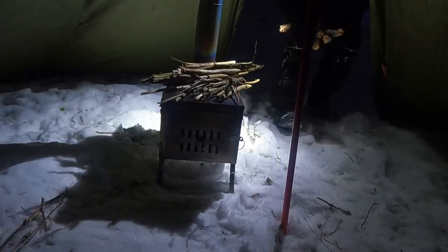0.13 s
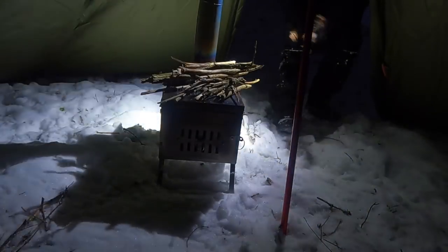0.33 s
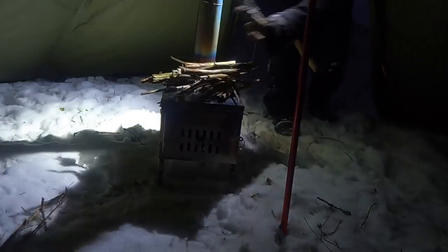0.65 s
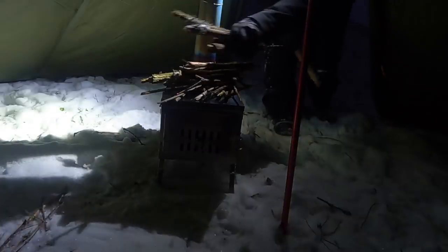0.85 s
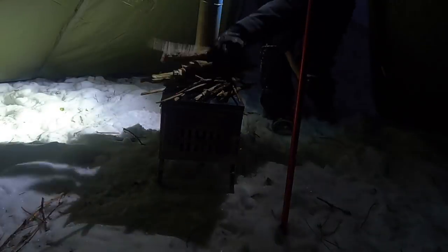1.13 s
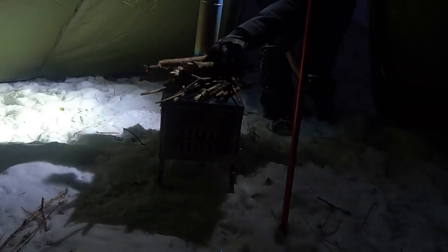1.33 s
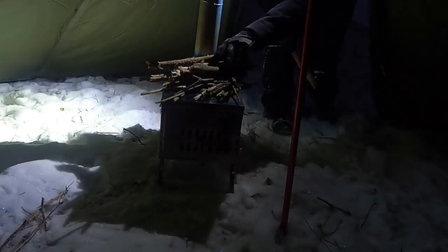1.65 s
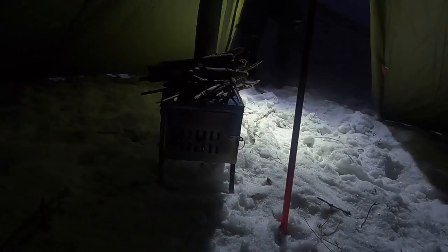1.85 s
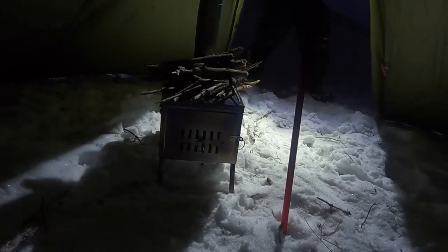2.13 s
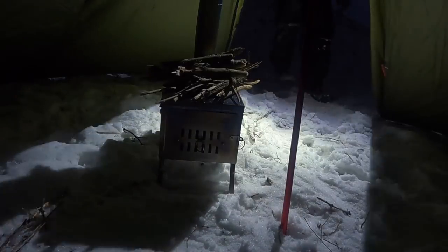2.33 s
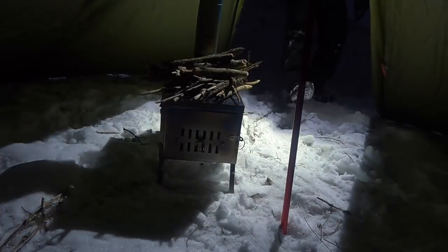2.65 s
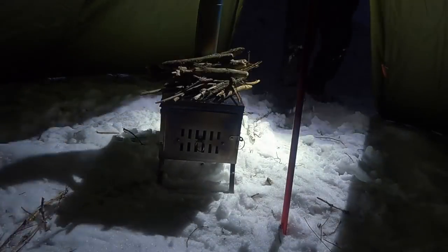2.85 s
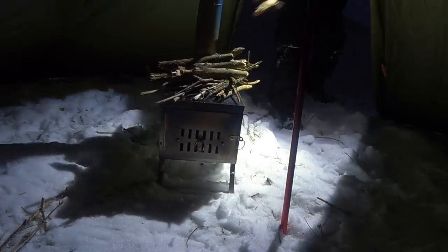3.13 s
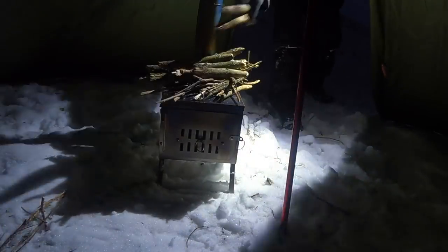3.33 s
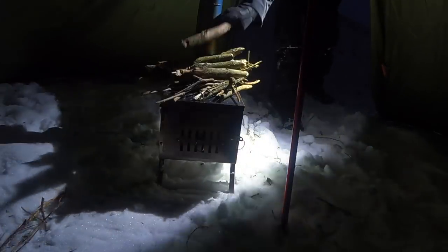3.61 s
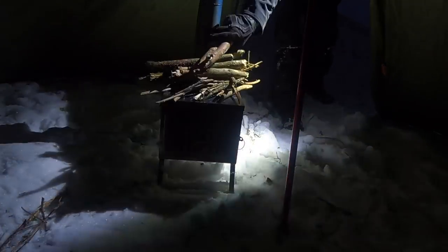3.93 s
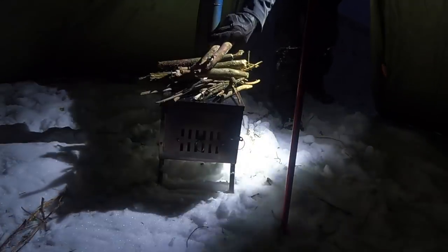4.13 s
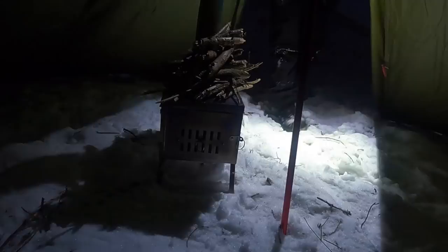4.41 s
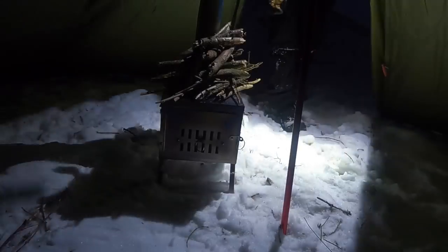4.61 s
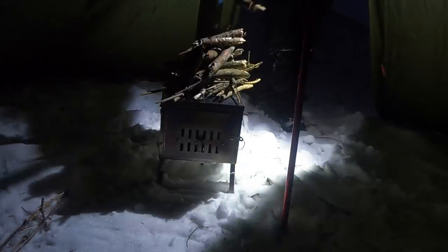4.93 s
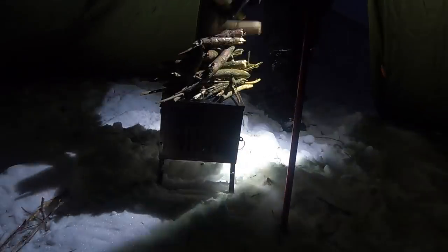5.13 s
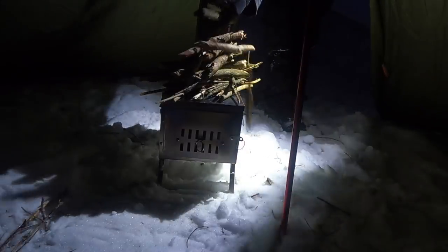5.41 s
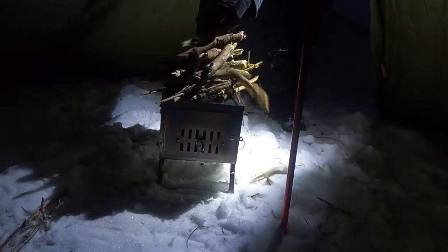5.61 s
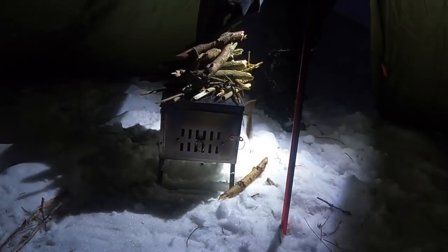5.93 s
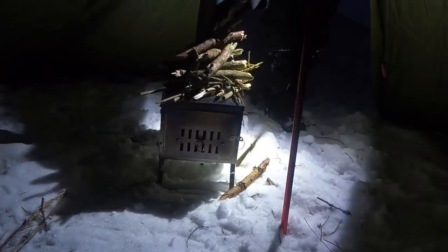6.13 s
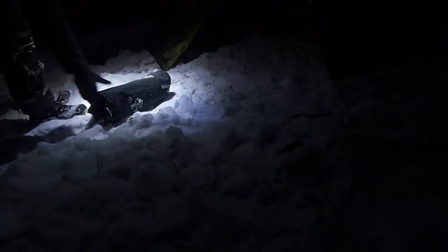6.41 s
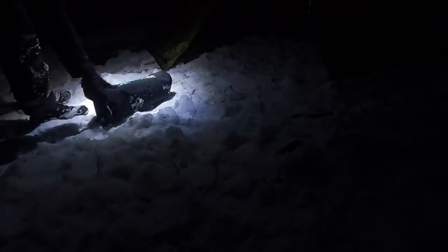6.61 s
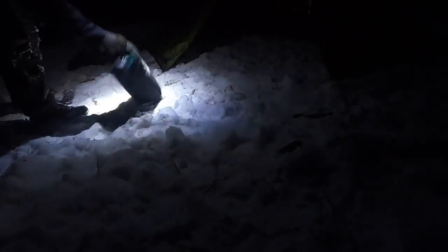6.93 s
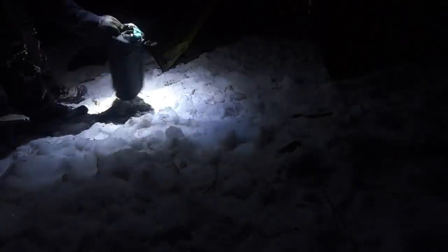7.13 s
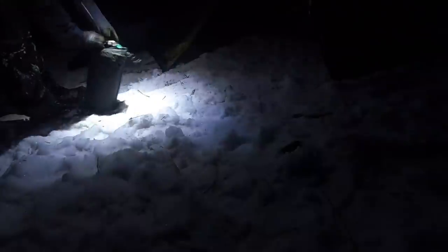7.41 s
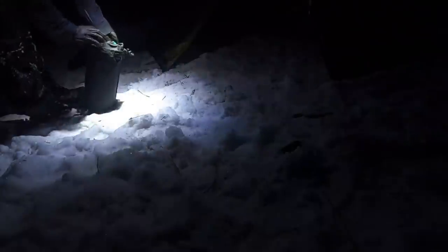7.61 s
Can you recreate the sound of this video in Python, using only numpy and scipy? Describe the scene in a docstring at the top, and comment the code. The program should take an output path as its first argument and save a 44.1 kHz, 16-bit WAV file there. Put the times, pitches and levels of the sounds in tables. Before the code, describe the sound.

Sticks are piled on a thin metal stove with wooden clatter and dull thumps, followed by crackling bag creases and soft snowy bumps.

```python
"""Tent pitched on snow: someone in a stiff jacket piles sticks on a sheet-metal stove; sticks knock, roll, drop.
Then, outside and straight ahead, a stuffed bag is picked up, crinkles and is set down in the snow.
Jacket, bag and snow rustle as dense noise grains; wood and creases are noise bursts that strike rings;
stove and soft bumps are struck modes. Boots shift over a low rumble, dull air noise and a faint wavering hum."""
import sys
import numpy as np
from scipy import signal
from scipy.fft import rfft, irfft
from scipy.io import wavfile

SR = 44100
rng = np.random.default_rng(int(sys.argv[2]) if len(sys.argv) > 2 else 0)


def wrap_up_sound(samples):
    """Save the sound to the file named by the first command line argument, as 16-bit audio."""
    columns = np.atleast_2d(samples).T
    # keep every value between -1 and 1, then stretch to whole-number steps
    tamed = np.clip(columns, -1, 1)
    steps = np.round(tamed * 32767).astype(np.int16)
    wavfile.write(sys.argv[1], SR, steps)


N = 342216
AHEAD_FROM_S, BAG_FROM_S = 6.14, 6.5   # sound centred and narrower; bag creases start


def amp(db):
    """dB to gain."""
    return 10 ** (np.asarray(db) / 20)


def rms_one(x):
    """Scale to rms 1."""
    return x / np.sqrt(np.mean(x ** 2) + 1e-20)


def at_hz(points, hz):
    """Read a spectrum on a log-frequency axis."""
    return np.interp(np.log(hz), np.log(np.array(points)[:, 0]), np.array(points)[:, 1])


def bins_hz(size):
    """FFT bin frequencies, DC raised to 1 Hz."""
    return np.maximum(np.fft.rfftfreq(size, 1 / SR), 1)


def colour(x, spectrum):
    """Shape the spectrum along the last axis."""
    size = x.shape[-1]
    return irfft(rfft(x) * amp(at_hz(spectrum, bins_hz(size))), size)


def coloured_noise(spectrum, shape):
    """Steady shaped noise, rms 1."""
    return rms_one(colour(rng.standard_normal(shape), spectrum))


def highpass(x, hz):
    """Second-order low cut."""
    return signal.sosfilt(signal.butter(2, hz, "high", fs=SR, output="sos"), x)


def in_time(rows):
    """Columns of a curve table, one value a sample."""
    s, *columns = np.transpose(rows)
    return [np.interp(np.arange(N) / SR, s, c) for c in columns]


def drift(rate_hz):
    """Slow chance of spread 1: noise through two equal poles, run at SR / 40."""
    r = np.exp(-80 * np.pi * rate_hz / SR)
    noise = rng.standard_normal(N // 40 + 2002)
    slow = signal.lfilter([1], [1, -2 * r, r * r], noise)[2000:]
    return np.interp(np.arange(N) / 40, np.arange(len(slow)), rms_one(slow))


def ring(clicks, hz, t60_s):
    """Two-pole resonator: a unit click starts a decaying sine of initial height 1."""
    r, w = amp(-60 / (t60_s * SR)), 2 * np.pi * hz / SR
    return signal.lfilter([0, np.sin(w)], [1, -2 * r * np.cos(w), r * r], clicks + 1e-18)


def grains(per_s, spread_db):
    """Random slips of uneven size and sign; rms 1."""
    sizes = amp(spread_db * np.minimum(rng.exponential(1, N), 5))
    signs = rng.choice([-1, 1], N)
    return rms_one(sizes * signs * (rng.random(N) < per_s / SR))


def add(out, s, sound, peak_db):
    """Mix a short sound in at time s, scaled to the peak of its first row."""
    i = int(s * SR)
    scaled = amp(peak_db) * sound / np.abs(sound[0]).max()
    out[:, i:i + sound.shape[1]] += scaled[:, :N - i]


# dull steady noise, opposite in the two channels: f/Hz, relative density/dB
AIR_SPECTRUM = [(24, -49), (40, -22), (196, -9), (235, -3), (301, -7), (900, -20), (1980, -120)]


def air():
    """Dull noise whose level drifts."""
    level_db = -74.5 + 2.0 * drift(6)
    return amp(level_db) * coloured_noise(AIR_SPECTRUM, N)


# faint wavering hum: t/s, f/Hz, level/dB
HUM_CURVE = [(0.0, 212, -68), (0.2, 234, -72), (0.35, 175, -67), (0.55, 191, -68), (0.75, 256, -76),
             (1.6, 255, -74), (1.8, 229, -69), (2.35, 227, -76), (2.9, 257, -74), (3.3, 248, -71),
             (3.45, 220, -72), (3.75, 213.7, -73), (4.1, 167, -65), (4.33, 191, -69), (4.45, 164, -69),
             (4.55, 162.5, -84), (5.1, 166, -83), (5.3, 165, -110)]


def hum():
    """A narrow, rough tone: slow noise carried on a gliding pitch."""
    hz, level_db = in_time(HUM_CURVE)
    phase = 2 * np.pi * np.cumsum(hz) / SR
    return amp(level_db) * (drift(24) * np.sin(phase) + drift(22) * np.cos(phase))


# low rumble course: t/s, level/dB
RUMBLE_CURVE = [(0.0, -64), (0.5, -58.5), (0.85, -64), (1.35, -56), (1.7, -69), (2.05, -55), (2.4, -58.5),
                (2.95, -57.5), (3.2, -62), (3.7, -57), (4.2, -62.5), (4.75, -72.5), (5.4, -61), (6.1, -62),
                (6.4, -50), (6.6, -64), (7.3, -65), (7.76, -56.5)]
# low rumble spectrum: f/Hz, relative density/dB
RUMBLE_SPECTRUM = [(11, -40), (18, -5), (65, 10.5), (82, -6), (130, -6), (157, 2.5), (200, -31), (260, -60),
                   (440, -120)]


def rumble():
    """Low shaped noise follows a level curve with slow drift."""
    level_db = in_time(RUMBLE_CURVE)[0] + 2.0 * drift(1.5)
    return amp(level_db) * coloured_noise(RUMBLE_SPECTRUM, (2, N))


# movements of jacket, pile, bag and boots:
# t/s, length/s, rustle start level/dB, rustle end level/dB, brightness/(dB/octave), low weight level/dB
MOVEMENTS = [(0.0, 0.39, -56.5, -53.5, -1.5, -63), (0.376, 0.44, -49, -55, -1, -62),
             (0.777, 0.21, -49, -58.5, -3.5, -48), (1, 0.25, -59, -64, -2, -62),
             (1.204, 0.14, -34.5, -54.5, -2.5, -42), (1.354, 0.2, -65.5, -63, -0.5, -53.5),
             (1.591, 0.13, -62.5, -54.5, -0.5, -56.5), (1.75, 0.14, -56, -59, -3.5, -60),
             (1.87, 0.17, -70, -57, -2.5, -65), (2.047, 0.19, -54.5, -51, -1, -60.5),
             (2.244, 0.6, -56.5, -78.5, -0.5, -69.5), (2.819, 0.41, -51.5, -57.5, -3.5, -60),
             (3.243, 0.31, -49.5, -50.5, -1, -63), (3.6, 0.22, -62, -61, 0.5, -64.5),
             (3.846, 0.072, -47, -58, -2.5, -47), (3.916, 0.29, -56.5, -64, -2.2, -59),
             (4.146, 0.13, -45.5, -61, -7, -56), (4.29, 0.065, -57.5, -49.5, -2, -73),
             (4.421, 0.1, -57.5, -54.5, -2, -57), (4.545, 0.21, -63, -58.5, -3, -66.5),
             (4.783, 0.43, -46.5, -47.5, -2, -63.5), (5.259, 0.082, -43.5, -46.5, -3, -55),
             (5.363, 0.19, -48.5, -54.5, -3, -57), (5.603, 0.16, -74, -46, 3, -42),
             (5.777, 0.21, -49, -66.5, -2.5, -55.5), (6, 0.12, -31.5, -56, -7, -47.5),
             (6.128, 0.71, -55.5, -60, -2.5, -65.5), (6.584, 0.13, -52.5, -53.5, -4, -54.5),
             (6.726, 0.15, -52.5, -50.5, -3.5, -53), (6.891, 0.27, -47.5, -49.5, -3, -58),
             (7.186, 0.31, -59, -57, -2.5, -57), (7.381, 0.03, -50.5, -47, -3.5, -67),
             (7.421, 0.087, -40, -36, -2.5, -46), (7.545, 0.077, -50.5, -59, -3, -57),
             (7.627, 0.025, -43.5, -49.5, -5, -61), (7.671, 0.068, -60, -57.5, -3.5, -65)]
ONSET_DB_PER_S, STOP_DB_PER_S, WEIGHT_FADE_DB_PER_S = 903, 698, 167
STILL_RUSTLE_DB, STILL_WEIGHT_DB = -72, -74.5   # floor between movements


def movements():
    """Rustle level, brightness, low weight: each movement sets in, glides, stops; overlaps add in power."""
    t = np.arange(0, N + 32, 32) / SR
    s, length_s, start_db, end_db, bright_db, weight_db = np.transpose(MOVEMENTS)[:, :, None]
    early, late = np.maximum(s - t, 0), np.maximum(t - s - length_s, 0)
    glide_db = start_db + (end_db - start_db) * np.clip((t - s) / length_s, 0, 1)
    onset_db = ONSET_DB_PER_S * early
    rustling = amp(glide_db - onset_db - STOP_DB_PER_S * late) ** 2
    weighing = amp(weight_db - onset_db - WEIGHT_FADE_DB_PER_S * late) ** 2
    total = rustling.sum(axis=0) + amp(STILL_RUSTLE_DB) ** 2
    weight = weighing.sum(axis=0) + amp(STILL_WEIGHT_DB) ** 2
    brightness = (rustling * bright_db).sum(axis=0) / total   # power-weighted
    return in_time(np.transpose([t, 10 * np.log10(total), brightness, 10 * np.log10(weight)]))


# low weight of movements: f/Hz, relative density/dB
WEIGHT_SPECTRUM = [(53, -57), (90, 0.5), (194, 7.5), (265, 4), (410, -2.5), (497, -38), (586, -10.5),
                   (800, -65), (1040, -60), (1760, -120)]


def low_weight(level_db):
    """Low noise under each movement, with an unsteady level."""
    return amp(level_db + 2.74 * drift(20.4)) * coloured_noise(WEIGHT_SPECTRUM, (2, N))


# fabric and snow: f/Hz, relative density/dB
RUSTLE_SPECTRUM = [(180, -27), (300, 6), (468, -8), (685, -7), (877, -13.5), (1300, -1.5), (1590, -4.5),
                   (1940, -3), (2320, -4.5), (2980, -3.5), (5660, -4), (6360, -3), (9450, -12),
                   (12100, -16.5), (13800, -26.5), (15500, -62)]


def rustle(level_db, bright_db):
    """Fabric and snow slip in dense grains; each half octave swells and fades a little."""
    slips = np.array([grains(9000, 3.3), grains(8300, 2.4)]) + 1.03 * rng.standard_normal((2, N))
    source = colour(slips, RUSTLE_SPECTRUM)
    edges_hz = 400 * 2 ** np.arange(0, 5.6, .5)
    together, plain, out = drift(13.8), 0, 0
    for k, (low, high) in enumerate(zip(edges_hz, edges_hz[1:])):
        bandpass = signal.butter(2, [low, high], "band", fs=SR, output="sos")
        band = (-1) ** k * signal.sosfilt(bandpass, source)
        octaves = np.log2(np.sqrt(low * high) / 2500)
        flutter_db = 1.4 * together + 1.7 * drift(12) + 1.5 * drift(1.5)
        plain = plain + band
        out = out + band * amp(bright_db * octaves + flutter_db)
    return amp(level_db) * out / plain.std()


# cloth folds giving a rustle a passing pitch: t/s, length/s, f/Hz, width/Hz, level/dB
FOLDS = [(0.0, 0.16, 1520, 400, -59.5), (0.371, 0.27, 1820, 400, -56), (0.383, 0.2, 5200, 900, -57),
         (0.597, 0.092, 4760, 780, -56.5), (2.178, 0.092, 3870, 700, -56.5),
         (2.279, 0.47, 2580, 497, -67.5), (2.821, 0.13, 1660, 400, -56), (3.237, 0.051, 3830, 500, -52),
         (3.433, 0.18, 2540, 1500, -48.5), (3.388, 0.11, 1250, 251, -60), (4.774, .12, 4120, 400, -68),
         (4.896, 0.19, 6500, 500, -51)]


def folds():
    """Rough noise through one resonance, swelling and fading over the length of the fold."""
    out = np.zeros((2, N))
    for s, length_s, hz, width_hz, level_db in FOLDS:
        i, size = int(max(s, 0) * SR), int(length_s * SR)
        rough = np.repeat(amp(4.3 * rng.standard_normal(50)), SR // 100)   # new level each 10 ms
        noise = rough * rng.standard_normal((2, SR // 2))
        t60_s = np.log(1000) / np.pi / width_hz
        tone = rms_one(ring(noise, hz, t60_s))[:, :size]
        out[:, i:i + size] += amp(level_db) * tone * np.sqrt(np.hanning(size))
    return out


def crackle(rustle_db):
    """Stiff bag creases pop at random, each ringing a few cycles at one of 14 pitches."""
    pops = grains(1100, 5.8) * amp(3.5 * drift(25))
    pitches_hz = np.geomspace(750, 4500, 14)
    dealt = rng.integers(0, len(pitches_hz), (2, N))
    rings = 0
    for k, hz in enumerate(pitches_hz):
        rings = rings + ring(pops * (dealt == k), hz, 9.6 / hz) * amp(-1.5 * np.log2(hz / 1500))
    handled = np.arange(N) > BAG_FROM_S * SR
    return amp(rustle_db - 4.5) * handled * rms_one(rings)


def thuds(events, body, contact_s, low_hz):
    """A short soft contact strikes every mode of the body anew; what rests on it damps the ring."""
    out, t = np.zeros((2, N)), np.arange(10000) / SR
    push = np.sin(np.pi * np.minimum(t / contact_s, 1))
    for s, peak_db, damping in events:
        keep = 1.5 - np.clip(damping, 0, 1.2)
        modes = np.array([amp(db) * ring(push, hz, t60_s * keep) for hz, db, t60_s in body])
        strength = amp(2.5 * rng.standard_normal((2, len(body))))
        # weak side row, random sign per mode: low thuds nearly alike in both channels
        strength[1] *= amp(-10) * rng.choice([-1, 1], len(body))
        add(out, s, strength @ modes, peak_db)
    return highpass(out, low_hz)


# soft bag and snow modes: f/Hz, relative level/dB, t60/s at damping 0.5
SOFT_MODES = [(69, -8, 0.053), (248, 19.5, 0.038), (309, 11.5, 0.068), (597, 12, 0.013)]
# boot and bag on snow: t/s, peak level/dB before low cut, damping 0-1
BUMPS = [(0.581, -43, 1), (6.723, -38, 0), (6.797, -35, 0), (6.927, -38, 0), (7.226, -44, 0.7),
         (7.265, -36.5, 0.1), (7.443, -25, 0), (7.46, -26.5, 0), (7.484, -22.5, 0.6), (7.518, -41, 0.9),
         (7.614, -39.5, 0.3)]


def soft_bumps():
    """Boot and bag strike the heavily damped soft modes."""
    return thuds(BUMPS, SOFT_MODES, contact_s=0.00044, low_hz=50.3)


# bump close on the right: t/s, peak level/dB before low cut and pan, damping 0-1
NEAR_BUMPS = [(0.297, -31.5, 1)]


def near_bump():
    """One soft bump, the same wave in both channels, 10 dB weaker on the left."""
    bump = thuds(NEAR_BUMPS, SOFT_MODES, contact_s=0.0012, low_hz=40)[0]
    return bump * amp([[-5], [5]])


# splintery contact: f/Hz, relative density/dB
CRACK_SPECTRUM = [(260, -12), (450, -8), (802, -14), (972, 0.5), (1270, -15), (1410, 7.5), (1730, -4.5),
                  (1920, 0.5), (3130, -2.5), (4210, -2.5), (6100, -6), (12100, -24), (15500, -42)]


def cracks(events, cycles, rise_s, uneven_db):
    """Splintery contacts die away and strike the piece's own rings, which fall 60 dB in some cycles."""
    out, t = np.zeros((2, N)), np.arange(8192) / SR
    octaves = np.log2(np.clip(np.fft.rfftfreq(len(t), 1 / SR), 300, None) / 2500)
    for s, peak_db, hz, t60_s, bright_db, share in events:
        contacts = np.repeat(amp(uneven_db * rng.standard_normal(64)), 128)   # uneven separate touches
        contacts[:128] = contacts[:512].max()   # firm first touch
        noise = contacts * rng.standard_normal((2, len(t)))
        decay = amp(-60 * t / np.clip(t60_s, .004, .5)) * np.minimum(t / rise_s, 1)
        spectrum = rfft(colour(noise, CRACK_SPECTRUM)) * amp(bright_db * octaves)
        wide = rms_one(decay * irfft(spectrum, len(t)))
        blow = noise * decay ** 1.5
        tuned = rms_one(ring(ring(blow, hz, 3.5 / hz), hz, cycles / hz))   # cascade: steep flanks
        further = 0
        for f in hz * 2 ** rng.uniform(-0.26, 1.057, 4):   # uneven piece: unrelated further rings
            gain = amp(min(bright_db, 0) * np.log2(f / hz))
            further = further + ring(blow, min(f, 12000), cycles / f) * gain
        share = np.clip(share, 0, 1)
        ringing = tuned + .45 * rms_one(further)
        add(out, s, share * ringing + (1 - share) * wide, peak_db)
    return highpass(out, 220)


# dry single ticks of twigs, bag creases, snow crust:
# t/s, peak level/dB before low cut, ring f/Hz, brightness/(dB/octave), ringing share 0-1
TICKS = [(0.3032, -34, 1160, -8.5, 0), (0.7956, -12, 3900, 9, 0.32), (0.7983, -8.5, 4430, 10, 0.76),
         (1.138, -33.5, 3200, 5, 0.7), (1.779, -35.5, 7560, -10, 0.53), (2.1243, -35.5, 1410, -5.5, 0),
         (2.8907, -28, 1670, 0, 0.7), (2.904, -34, 1730, -1, 0.6), (3.0078, -28, 2440, 11, 0.94),
         (3.0981, -31, 2420, 3, 0.7), (3.499, -35, 1330, -13, 1), (3.615, -40.5, 3000, 5, 0.6),
         (3.685, -40, 3030, 0, 0), (3.895, -42, 3800, 0, 0.4), (4.045, -49, 2610, 1, 0.5),
         (4.4953, -38, 1740, 14, 0.9), (6.2987, -34, 560, -1, 0.46), (6.5335, -20.5, 2350, 20, 1),
         (6.554, -42, 3700, 8, 1), (6.572, -49, 2000, -6, 0.5), (6.606, -28, 4740, 2.5, 0.65),
         (6.615, -33, 1740, 2, 0.7), (6.632, -36, 1520, 3, 1), (6.6462, -26, 2300, 9, 0.8),
         (6.689, -45, 1700, -4, 0.7), (6.7217, -34.5, 2120, -2, 0.63), (6.725, -29, 2320, -5, 0.1),
         (6.742, -36, 1600, -17, 0.6), (6.782, -35, 1464, -5, 0), (6.8047, -30, 1510, -5, 0),
         (6.831, -43, 2820, -2, 0.5), (6.87, -34, 1860, -17, 1), (6.908, -34, 1000, -5, 0.9),
         (6.927, -23.5, 1320, -2.5, 0.42), (6.9779, -29, 1200, -4, 0.4), (6.993, -30.5, 5000, -1, 0.2),
         (7.0026, -32, 1150, -2.5, 0.4), (7.046, -35, 3500, -4, 0.1), (7.083, -38, 1420, 3, 0.8),
         (7.1093, -31, 2190, -5.5, 0), (7.139, -34.5, 4823, -9, 0.55), (7.1633, -34.5, 3460, 2, 0.7),
         (7.226, -40, 1800, -6, 0.1), (7.2655, -29, 1410, -6.5, 0.1), (7.4332, -25.5, 1280, -15, 0.5),
         (7.4402, -22, 1210, -5, 0.76), (7.4621, -22.5, 1500, 4, 0.5), (7.472, -28, 3560, 5, 0),
         (7.5178, -27.5, 1740, -8, 1), (7.556, -36, 2200, -4, 0.3), (7.611, -38, 5500, 3, 0),
         (7.6183, -29.5, 2800, -1, 0.54), (7.654, -39, 1986, -3.5, 0), (7.675, -34.5, 2130, 9, 0.8),
         (7.693, -38, 2000, -0.5, 0), (7.727, -37.5, 3720, -0.5, 0.2)]


def dry_ticks():
    """Very short cracks with rings of few cycles."""
    t60_s = 0.011
    events = [(s, db, hz, t60_s, bright_db, share) for s, db, hz, bright_db, share in TICKS]
    return cracks(events, cycles=7.5, rise_s=0.00074, uneven_db=1.5)


# sticks clattering and scraping on the pile:
# t/s, peak level/dB before low cut, ring f/Hz, t60/s, brightness/(dB/octave), ringing share 0-1
CLATTERS = [(0.805, -30, 1480, 0.15, -17, 0.4), (0.838, -36, 1000, 0.2, -1.5, 0.5),
            (0.904, -40, 2800, 0.07, 2, 0.46), (0.92, -37, 1400, 0.057, -4, 0.27),
            (0.94, -42, 687, 0.084, -17, 0.52), (1.173, -30.5, 5400, 0.089, 0, 0.5),
            (1.1801, -19.5, 1504, 0.1, 2.5, 0.9), (1.1875, -15, 5150, 0.029, -1.5, 0.37),
            (1.2005, -33.5, 1040, 0.08, 3, 0.9), (1.2262, -24, 1020, 0.2, -1, 0.3),
            (1.246, -19.5, 1185, 0.1, -6, 0.26), (1.262, -23.5, 805, 0.093, -17, 0),
            (1.283, -33, 1010, 0.32, -9, 0.3), (1.4728, -42.5, 7040, 0.24, 2, 0.52),
            (1.503, -35.5, 1440, 0.25, -7, 0.33), (1.698, -44, 2820, 0.08, -2, 0.8),
            (1.8245, -34.5, 1020, 0.09, 0, 0.38), (3.8422, -29.5, 1440, 0.18, -9, 0.22),
            (3.9166, -31.5, 4010, 0.028, 2.5, 0.59), (4.131, -24.5, 1406, 0.21, 3, 0.14),
            (4.1594, -29, 3830, 0.14, 0, 0.4), (4.233, -37.5, 1490, 0.19, -1, 0.14),
            (4.3337, -33, 1420, 0.15, -1, 0), (4.3492, -31.5, 1450, 0.16, -8.5, 0.25),
            (4.42, -42.5, 6900, 0.1, 2, 0.4), (5.192, -35, 1300, 0.14, -5, 0),
            (5.2281, -24.5, 1410, 0.14, -0.5, 0.43), (5.2585, -27, 7770, 0.09, 9, 0.4),
            (5.4149, -27.5, 1110, 0.1, -9, 0.26), (5.491, -27, 1445, 0.19, -9.5, 0.16),
            (5.556, -36.5, 1580, 0.32, 7, 0.2), (5.5738, -24.5, 4820, 0.05, -6, 0.43),
            (5.5745, -27.5, 5720, 0.043, 13, 1), (5.575, -31, 2700, 0.034, -2, 1),
            (5.597, -26, 1630, 0.15, -7, 0.13), (5.647, -28, 1500, 0.054, -7, 0.2),
            (5.656, -16.5, 3600, 0.096, 4, 0.32), (5.6693, -19.5, 1458, 0.2, -7.5, 0.25),
            (5.8072, -37.5, 5450, 0.044, 10, 1), (5.8132, -37, 5350, 0.079, 10, 1),
            (5.906, -29, 1720, 0.07, 5.5, 0.39), (5.916, -29.5, 4870, 0.17, 9, 0.24),
            (5.9463, -33.5, 4570, 0.059, 8, 0.85), (5.966, -40, 4800, 0.035, 17, 0.7),
            (5.984, -10.5, 1440, 0.11, 1.5, 0.57), (5.9991, -22, 1390, 0.073, -9.5, 0),
            (6.0575, -24, 1445, 0.065, -2.5, 0.77), (6.059, -18, 2740, 0.016, 4.5, 0.82),
            (6.074, -31.5, 1790, 0.12, 0, 0.84), (6.145, -34.5, 2650, 0.087, 13, 0.22)]


def stick_clatter():
    """Longer cracks with rings of many cycles."""
    return cracks(CLATTERS, cycles=63.0, rise_s=0.0022, uneven_db=1.5)


# stove panel modes: f/Hz, relative level/dB, t60/s at damping 0.5
STOVE_MODES = [(100, -26, 0.1), (147.2, -12.5, 0.18), (210, -7.5, 0.055), (272.3, 3, 0.12), (314, 0, 0.11),
               (402, -4, 0.046), (560, -10, 0.19), (660, -10, 0.12), (1100, -12.5, 0.055),
               (1146, 9.5, 0.43), (1440, -22, 0.073), (1880, -21, .08)]
# sticks landing on the stove: t/s, peak level/dB before low cut, damping 0-1
STOVE_THUDS = [(0.777, -32, 0), (0.824, -23.5, 0.75), (0.844, -26, 0.7), (1.1815, -17.5, 0.26),
               (1.193, -25, 0.3), (1.2245, -12, 0.7), (1.245, -13.5, 0.9), (1.285, -47, 0.8),
               (1.321, -29.5, 1), (1.503, -26, 0.3), (1.736, -38.5, 0.6), (1.772, -31, 0),
               (1.825, -37, 0.2), (3.84, -29, 0), (3.9, -32.5, 0.4), (4.135, -40.5, 0.25),
               (4.34, -24.5, 0.6), (5.232, -22.5, 0.84), (5.258, -34, 0.8), (5.368, -32.5, 0.7),
               (5.415, -32, 0.1), (5.49, -31.5, 0.1), (5.595, -17, 1), (5.656, -21, 1), (5.674, -20, 0.5),
               (5.709, -27.5, 0.8), (5.781, -34, 0.56), (5.907, -31.5, 1), (5.983, -10, 0.46),
               (6.004, -23, 0.2), (6.029, -23.5, 0)]


def stove_thuds():
    """Landing sticks strike the sheet-metal modes."""
    return thuds(STOVE_THUDS, STOVE_MODES, contact_s=0.001337, low_hz=85.5)


def tent(x):
    """Canvas walls over snow return a short, dull, diffuse tail."""
    t = np.arange(8000) / SR
    noise = rng.standard_normal(8000) * amp(-60 * t / 0.066) * (t > .004)   # t60 66 ms, 4 ms gap
    tail = signal.lfilter([.4], [1, -.6], noise)
    return amp(-17) * signal.fftconvolve(x, [tail / np.linalg.norm(tail)], axes=1)[:, :N]


# stove side, phase by which left leads: f/Hz, phase/rad
LEAD = [(60, 0), (330, -0.05), (690, -0.4), (1120, -0.25), (3190, -0.9), (3880, -0.5), (5680, -0.3),
        (10900, 0.1)]
# stove side, left minus right: f/Hz, level/dB
TILT = [(60, 0.5), (300, -0.5), (550, -1), (1100, -2.5), (2200, -0.5), (4500, -1.3), (9000, 0.5)]
# side gain before AHEAD_FROM_S: f/Hz, gain/dB
WIDTH = [(60, -31), (150, -33), (380, -18.5), (950, -17.5), (2380, -12.5), (5980, -11), (15000, -5.5)]


def place(middle, side):
    """Left and right: the right channel mostly leads at the stove; later the middle is centred."""
    ahead = np.arange(N) > AHEAD_FROM_S * SR
    hz = bins_hz(N)
    turn = np.exp(.5j * at_hz(LEAD, hz)) * amp(at_hz(TILT, hz) / 2)
    stove_side = irfft(rfft(middle * ~ahead) * np.array([turn, 1 / turn]), N)
    difference = colour(side, WIDTH) * amp(-8 * ahead) + hum() + air()   # 8 dB narrower when ahead
    return stove_side + middle * ahead + difference * [[1], [-1]]


def scene():
    """Sum the layers as two rows: what the channels share, and their difference; then place them."""
    rustle_db, bright_db, weight_db = movements()
    handling = low_weight(weight_db) + rustle(rustle_db, bright_db) + folds() + crackle(rustle_db)
    hits = soft_bumps() + dry_ticks() + stick_clatter() + stove_thuds()
    inside = np.arange(N) < AHEAD_FROM_S * SR
    middle, side = rumble() + handling + hits + tent(hits * inside)
    return place(middle, side) + near_bump()


def record(dry):
    """Steep top cut at 16.1 kHz."""
    return signal.sosfilt(signal.cheby2(12, 70, 16100, fs=SR, output="sos"), dry)


dry = scene()
out = record(dry)
wrap_up_sound(out)
```